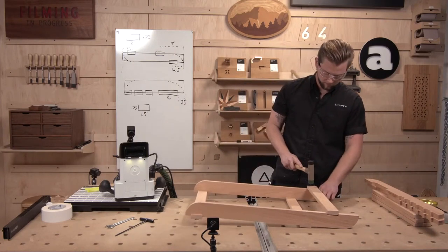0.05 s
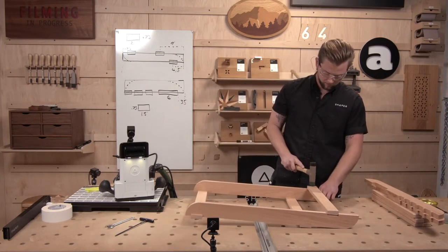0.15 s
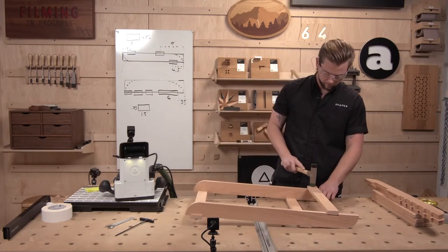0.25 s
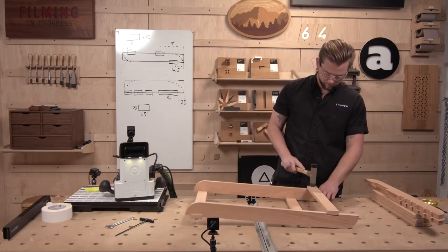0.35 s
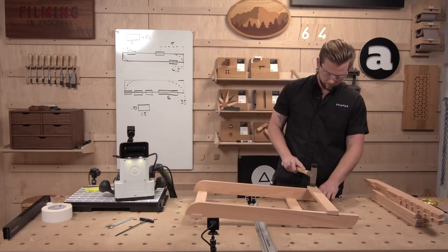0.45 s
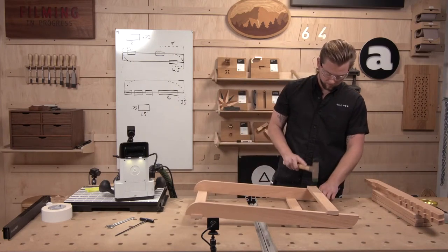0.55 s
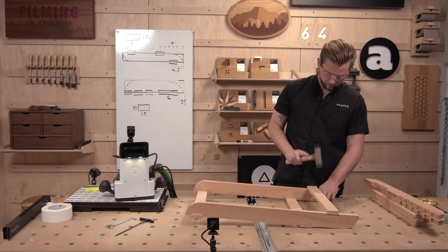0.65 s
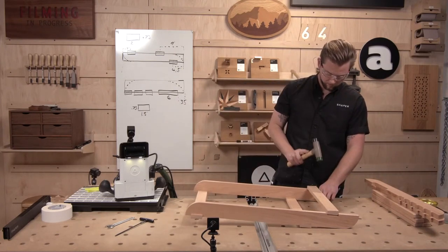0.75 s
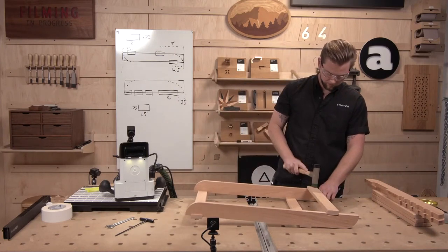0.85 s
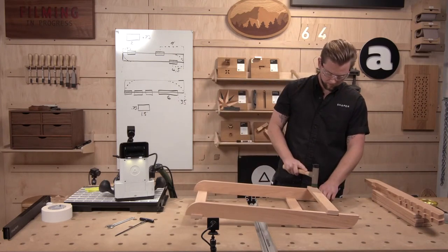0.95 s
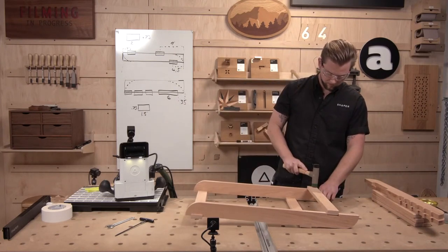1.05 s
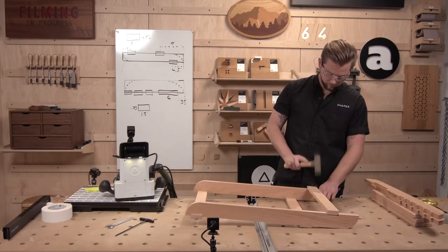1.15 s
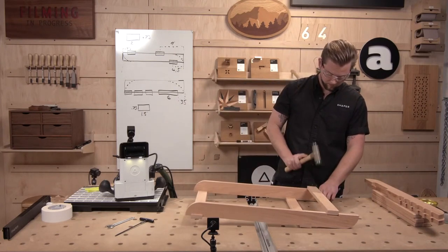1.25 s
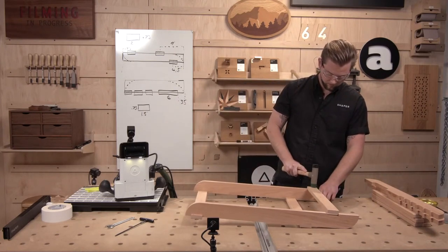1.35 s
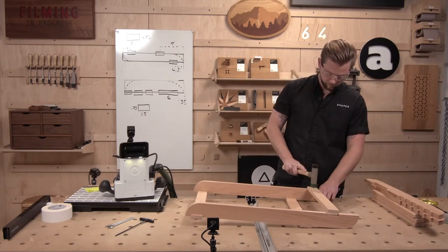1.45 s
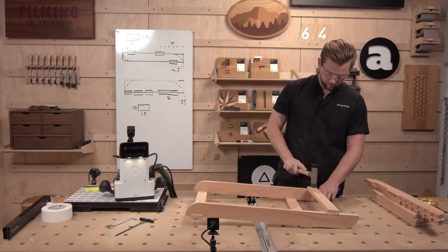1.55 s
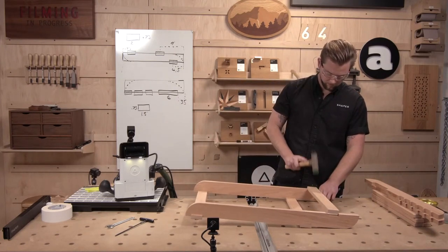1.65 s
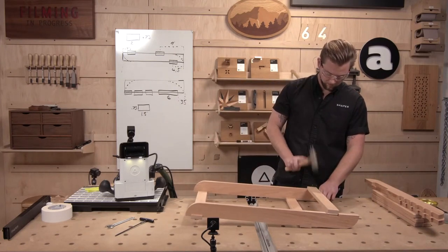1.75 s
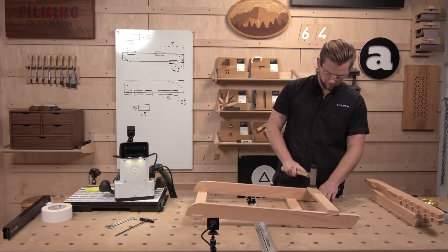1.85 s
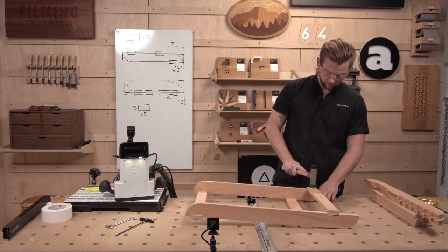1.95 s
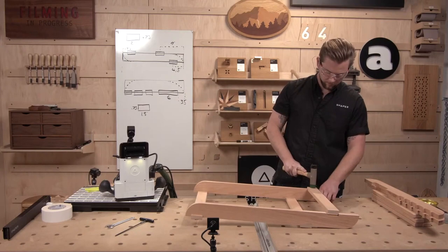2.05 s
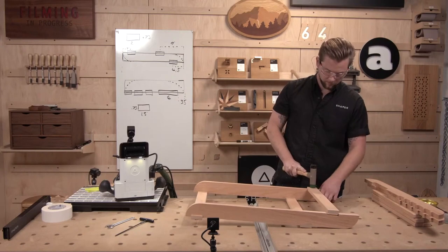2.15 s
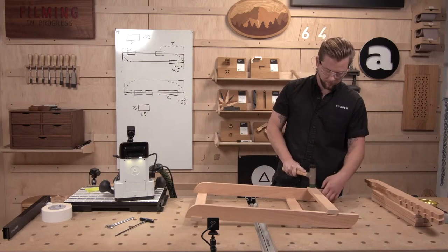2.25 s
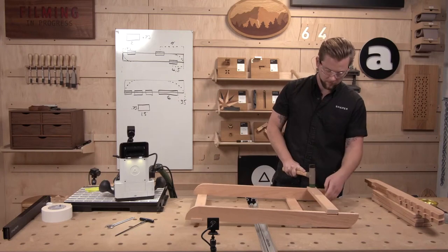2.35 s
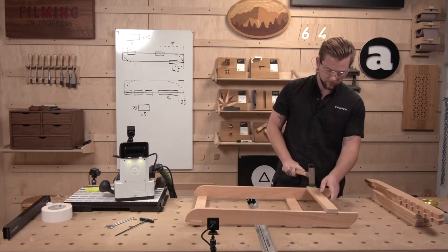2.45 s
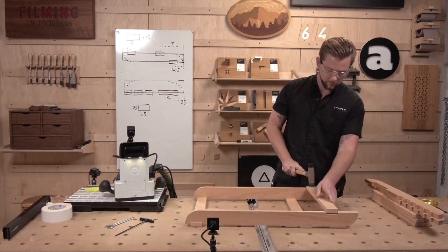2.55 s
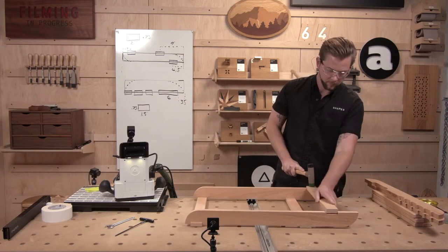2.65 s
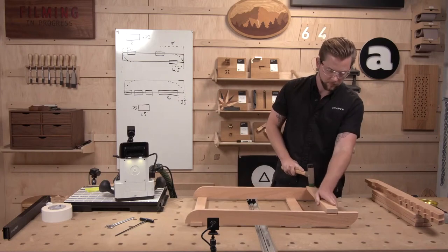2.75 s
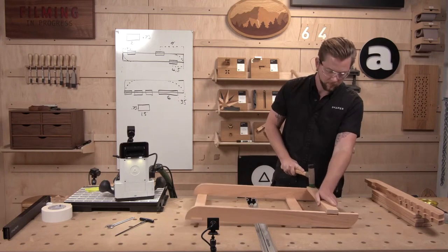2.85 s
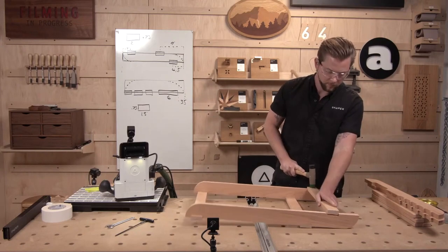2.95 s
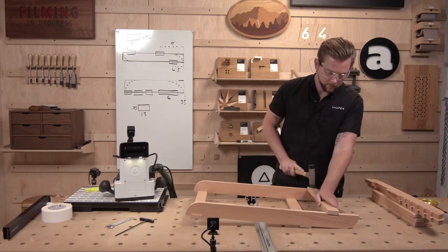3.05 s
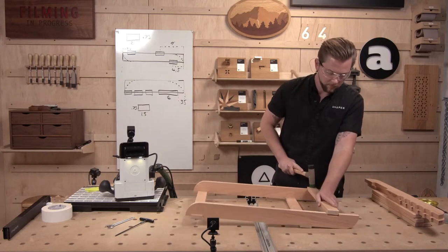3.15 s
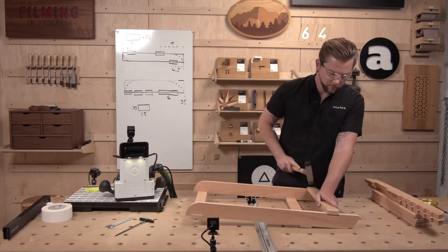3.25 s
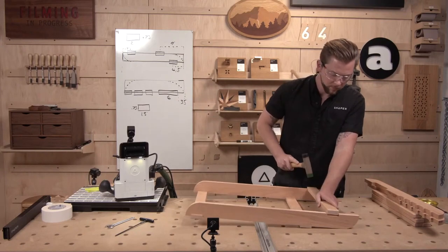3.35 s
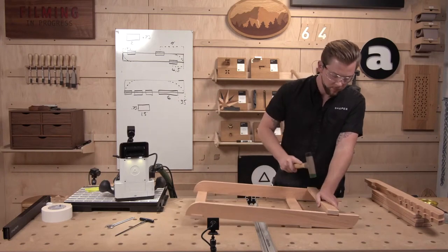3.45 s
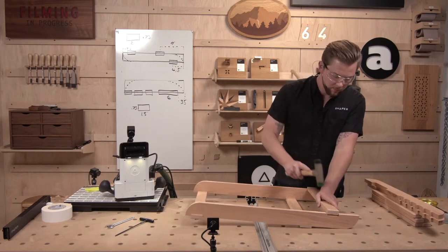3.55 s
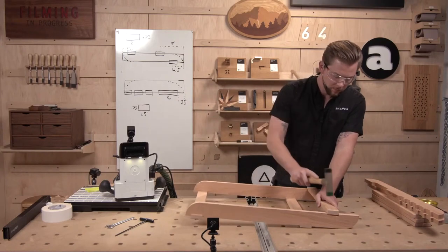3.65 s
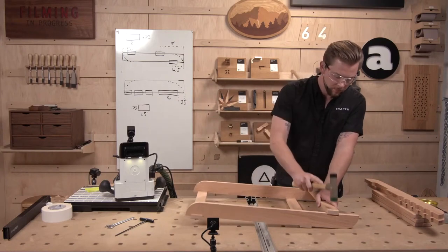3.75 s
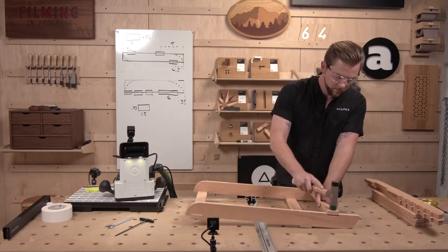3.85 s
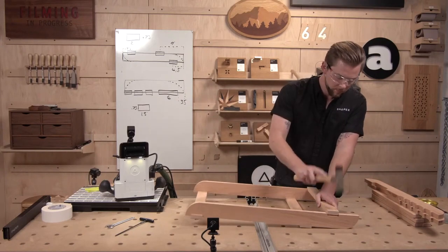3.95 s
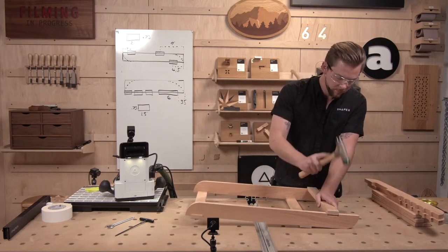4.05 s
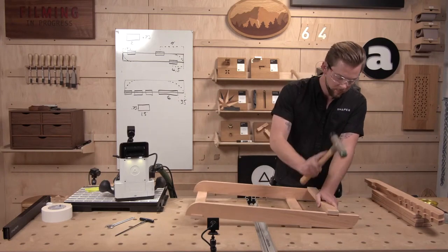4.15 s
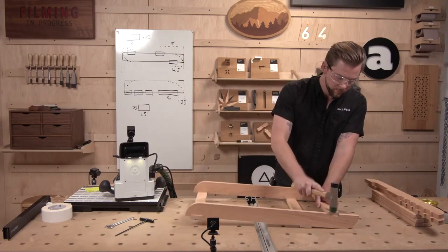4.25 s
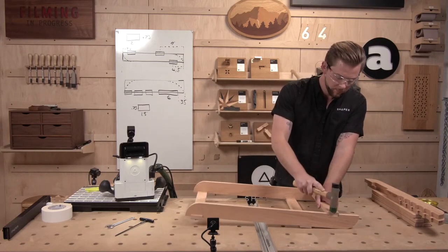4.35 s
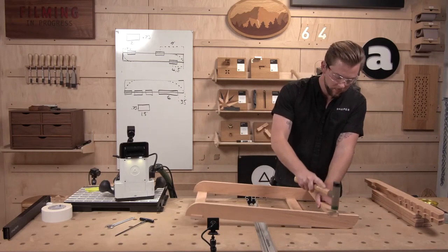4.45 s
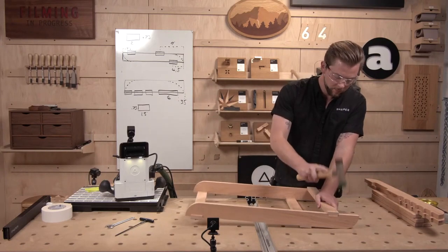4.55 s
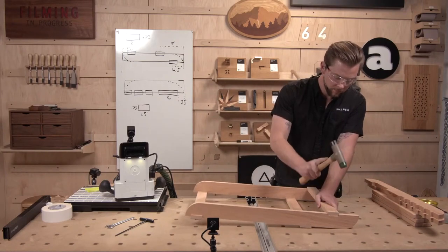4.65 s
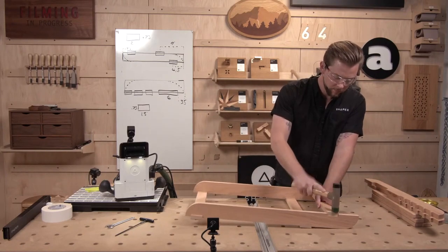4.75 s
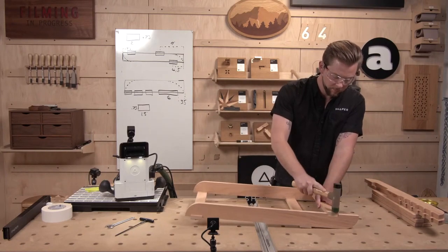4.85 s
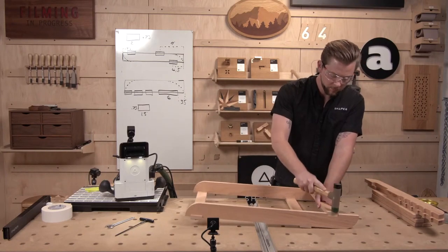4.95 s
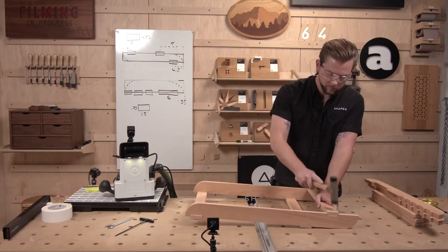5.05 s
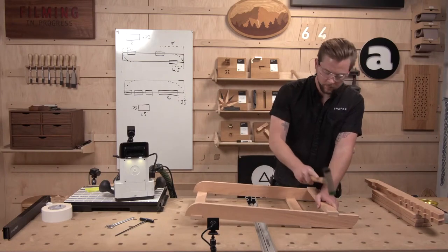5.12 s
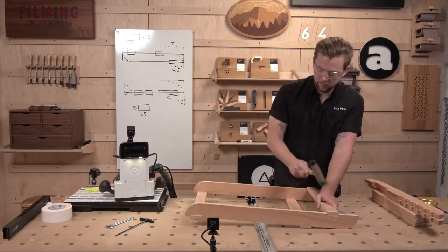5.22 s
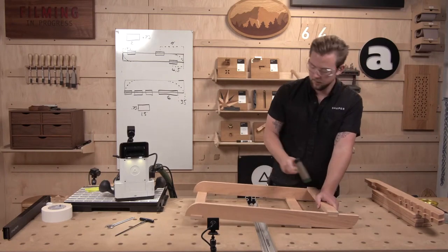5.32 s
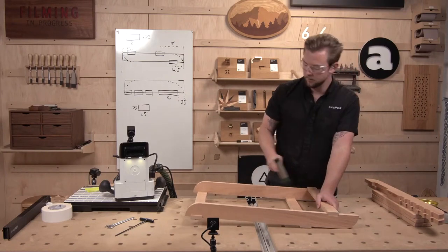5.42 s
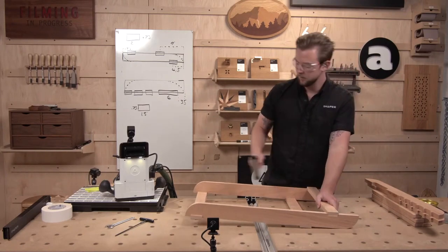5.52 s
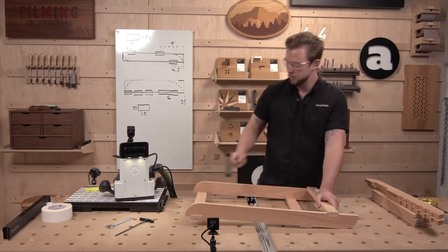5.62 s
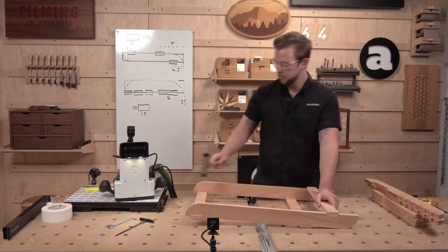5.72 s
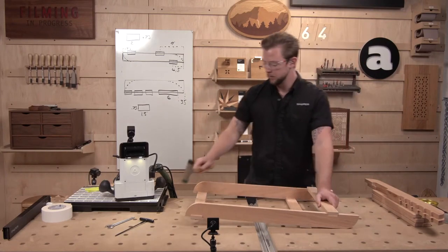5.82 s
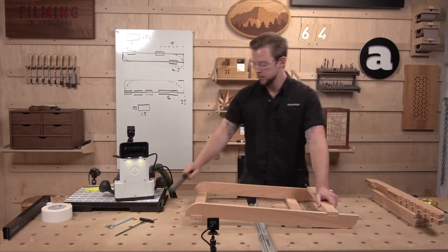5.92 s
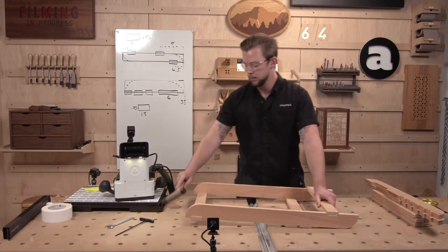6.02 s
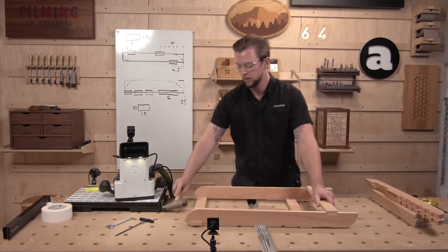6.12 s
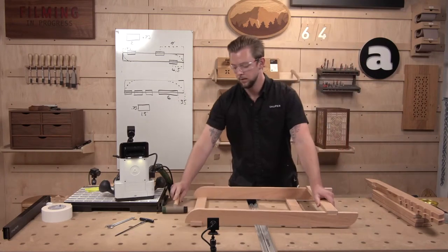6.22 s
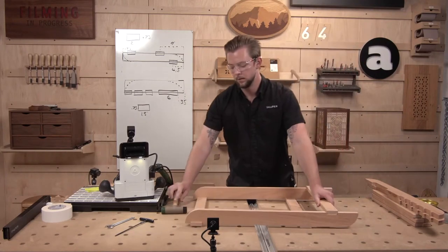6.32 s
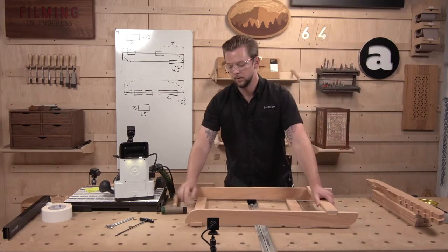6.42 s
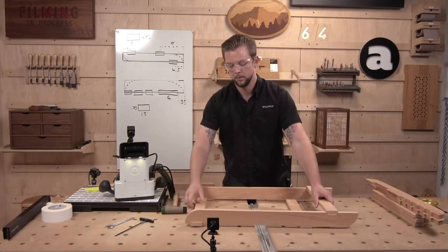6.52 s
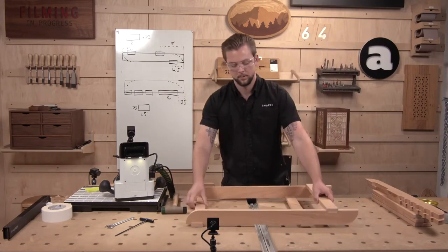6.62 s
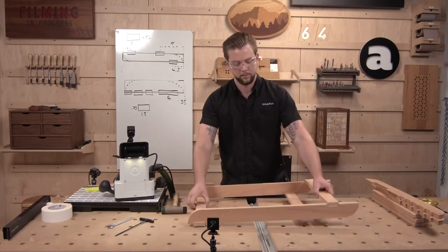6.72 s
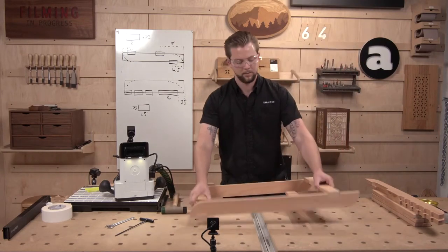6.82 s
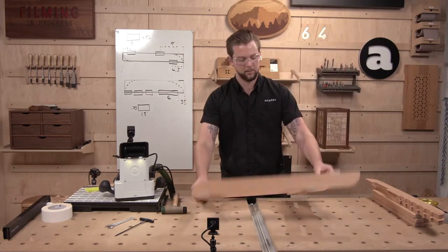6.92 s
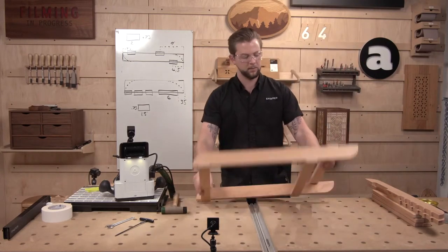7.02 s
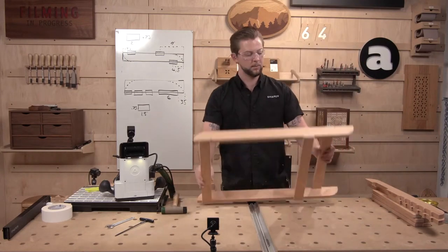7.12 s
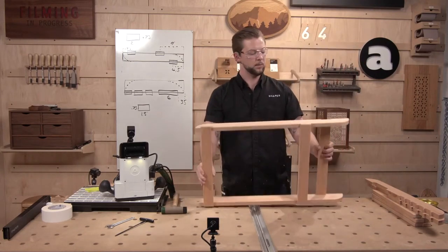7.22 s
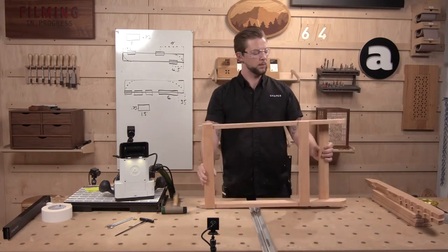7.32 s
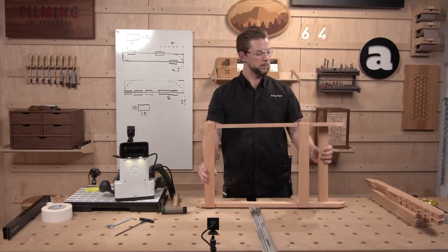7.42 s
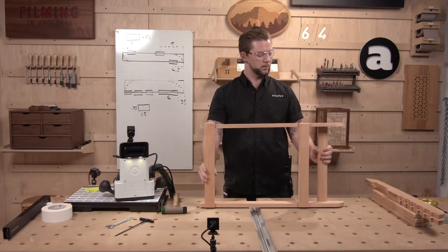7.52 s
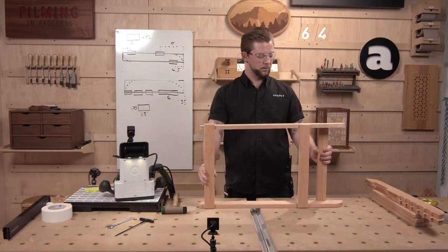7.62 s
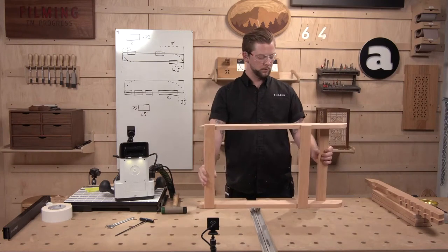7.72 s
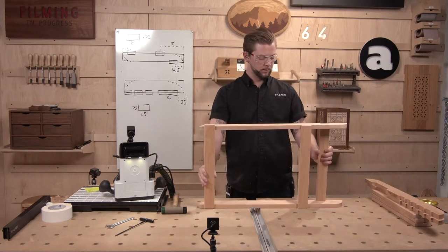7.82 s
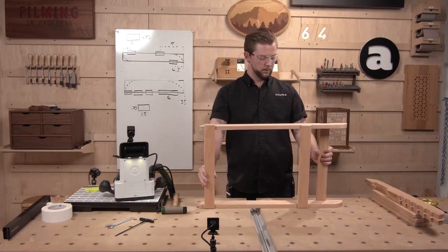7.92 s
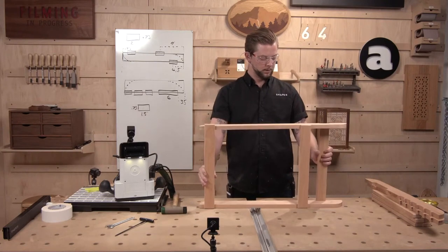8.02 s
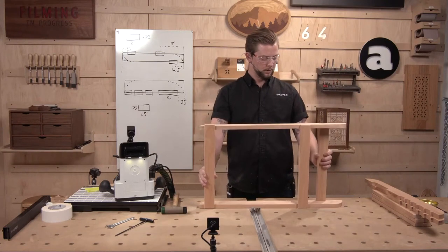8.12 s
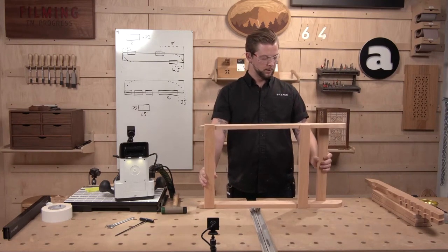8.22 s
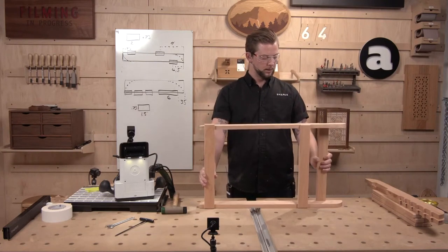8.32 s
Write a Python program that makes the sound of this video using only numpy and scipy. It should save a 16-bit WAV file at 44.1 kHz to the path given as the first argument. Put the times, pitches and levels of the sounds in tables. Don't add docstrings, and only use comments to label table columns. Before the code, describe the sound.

Heard from a microphone on the worker's clothing: fast light wooden taps die away, three hard mallet strikes ring through wood and bench, and the piece bumps down with small ticks. Three further strikes land, the middle one hardest. After a pause the frame clatters onto the bench, scrapes briefly and is set upright with dull knocks, amid rustling cloth, faint room hiss and an open workshop echo.

```python
import sys
import numpy as np
from scipy import signal
from scipy.fft import rfft, irfft
from scipy.io import wavfile
from scipy.ndimage import uniform_filter1d, map_coordinates

SR = 44100
rng = np.random.default_rng(int(sys.argv[2]) if len(sys.argv) > 2 else 0)


def digitize_waveform(pressure):
    field = np.atleast_2d(pressure).T
    bounded = np.clip(field, -1, 1)
    quanta = np.round(bounded * 32767).astype(np.int16)
    wavfile.write(sys.argv[1], SR, quanta)


def gain_from_db(level_db):
    decades = np.asarray(level_db, float) / 20
    return 10 ** decades


N = 369558
SIZE = 2 ** 13
HZ = np.fft.rfftfreq(SIZE, 1 / SR)
ROCK_TREBLE_DB = -32.5

# frequency in Hz, level in dB re peak, t60 in s.
BENCH_DRONE = [(174, -49, 2.6), (312, -60, .6), (393, -62, .5)]
SEATED_DB = [
    -13.5,
    -9,
    -6,
]


def unit(x):
    return x / np.sqrt(np.mean(x ** 2) + 1e-30)


def along(points, hz):
    f, v = np.transpose(points)
    return np.interp(np.log(hz + 1), np.log(f + 1), v)


def wobble(rate):
    knots = rng.standard_normal(int(N * rate / SR) + 4)
    return map_coordinates(knots, [np.arange(N) * rate / SR])


def hiss(spectrum, size=N, tilt=((1, 0),)):
    hz = np.fft.rfftfreq(size, 1 / SR)
    gain = gain_from_db(along(spectrum, hz) + along(tilt, hz))
    return unit(irfft(rfft(rng.standard_normal(size)) * gain, size))


def causal(db):
    cepstrum = irfft(np.log(gain_from_db(db)), SIZE)
    cepstrum[1:SIZE // 2] *= 2
    cepstrum[SIZE // 2 + 1:] = 0
    return np.exp(rfft(cepstrum))


def resonant(peaks, hz):
    return sum((-1) ** k * gain_from_db(db) * 1j * hz * width / (centre ** 2 - hz * hz + 1j * hz * width)
               for k, (centre, width, db) in enumerate(peaks))


def ringing(modes, longest_s, size):
    t = np.arange(size) / SR
    swell = (1 - t / t[-1]) * (1 - np.exp(-(t / .0008) ** 2))
    return swell * sum(gain_from_db(db - 60 * t / min(t60, longest_s)) * np.sin(2 * np.pi * hz * t)
                       for hz, db, t60 in modes)


def dying(tone, tilt, t60s, onset_s, size):
    hz, t, bands = signal.stft(hiss(tone, size, tilt), SR, nperseg=256)
    decay = gain_from_db(-60 * t / along(t60s, hz)[:, None])
    tail = signal.istft(bands * decay, SR, nperseg=256)[1][:size]
    return tail * (1 - np.exp(-(np.arange(size) / SR / onset_s) ** 2))


def contacts(events, tones, peaks, own, rebounds, ring_tone, room_tone, soft_hz, scatter, size, mirrored=False):
    # frequency in Hz, t60 in s.
    wood_t60 = [(60, 0.24), (250, 0.1), (700, .13), (2000, 0.14), (5000, 0.067), (12000, 0.12)]
    room_t60 = [(60, 0.79), (250, 1.8), (700, 0.44), (1000, .7), (1500, 0.94), (3000, 1.144), (6000, 1.4),
                (12000, 0.8)]
    # delay in s, level in dB.
    usual_rebounds = [(.0009, 1.5), (.002, 5), (.004, -14), (.008, -16.5), (.013, -16)]
    room_keeps = 0.15
    out, events = np.zeros(N + size), np.array(events)
    soft = 1 / (1 + 1j * HZ / soft_hz) ** 4
    usual_bass, usual_treble = np.median(events[:, 2:4], axis=0)
    for k, ((s, peak_db, bass_db, treble_db, room_db, ring_db), tone) in enumerate(zip(events, tones)):
        bass, treble = bass_db - usual_bass, treble_db - usual_treble
        tilt = [(250, bass), (1000, 0), (4500, treble), (12000, treble)]
        if k < len(own):
            wood, echoes = resonant(own[k], HZ), rebounds[k]
        else:
            wood, echoes = resonant(peaks, HZ) * causal(along(tilt, HZ)), usual_rebounds

        wood_db = 20 * np.log10(np.abs(wood * soft)[1:] + 1e-6)
        room_colour = np.transpose([HZ[1:], room_keeps * (wood_db - uniform_filter1d(wood_db, size=400))])
        slap_s, slap_db = echoes[0]
        mirror = 1 + gain_from_db(slap_db) * np.exp(-2j * np.pi * HZ * slap_s)
        mirror_db = 20 * np.log10(np.abs(mirror) + .05)
        ring_db_per_hz = along(tilt, HZ) + mirror_db * mirrored / (1 + (HZ / 1200) ** 2)
        ring_colour = np.transpose([HZ, ring_db_per_hz])[1:]

        force = 1
        for lag, db in echoes:
            lag = lag * (1 + scatter * rng.uniform(-1, 1))
            force = force + gain_from_db(db) * np.exp(-2j * np.pi * HZ * lag)
        direct = irfft(force * wood * soft, SIZE)[:SIZE // 2]

        sound = tone + gain_from_db(room_db) * dying(room_tone, room_colour, room_t60, 0.0063, size)
        sound[:SIZE] += gain_from_db(ring_db) * dying(ring_tone, ring_colour, wood_t60, 0.00091, SIZE)
        sound[:SIZE // 2] += direct / np.abs(direct).max()
        out[round((s + .0008) * SR):][:size] += gain_from_db(peak_db) * sound
    return out[:N]


def bumps(events, peaks, own, ring_tone, bass_db_per_octave, soft_hz, note_db, note_t60, room_db, size):
    # frequency in Hz, level in dB per Hz.
    room_tone = [(76, -31.5), (130, 6), (183, -8), (527, -1), (571, 2.5), (980, -0.5), (3300, -12.5),
                 (7250, -30.5), (13200, -41), (15500, -41)]
    # delay in s, level in dB.
    bounces = [(.004, -14), (.008, -13), (.013, -13)]
    notes, rows = [], []
    for s, db, treble_db, ring_db, hz in events:
        notes.append(ringing([(hz, ring_db + note_db, note_t60)], 1, size))
        bass_db = bass_db_per_octave * np.log2(hz)
        rows.append((s, db, bass_db, treble_db, room_db, ring_db))
    return contacts(rows, notes, peaks, own, [bounces] * len(own), ring_tone, room_tone,
                    soft_hz, scatter=0.307, size=size)


def room_air():
    # frequency in Hz, level in dB per Hz.
    air_colour = [(60, -30), (100, -3), (177, -14.5), (219, -2.5), (300, -20.5), (560, -20.5),
                  (1500, -32.5), (5000, -41), (12500, -41), (13500, -50), (16000, -62)]
    return gain_from_db(-73 + 3.0 * wobble(1.4)) * hiss(air_colour)


def body_rumble():
    # time in seconds, rumble level in dB.
    movement = [(0.0, -54), (0.7, -55.5), (1.07, -54.5), (1.3, -53.5), (1.47, -59), (2.22, -62),
                (2.38, -54), (3.26, -51.5), (3.71, -59), (4.15, -49), (4.46, -58.5), (5.09, -65.5),
                (5.6, -52), (6.33, -55.5), (7.19, -53), (7.63, -54.5), (7.98, -56.5), (8.38, -55)]
    # frequency in Hz, level in dB per Hz.
    rumble_colour = [(8.8, -26.5), (15, 5), (46, -3.5), (119, -21), (160, -27.5), (177, -44), (222, -37.5),
                     (300, -25.5), (390, -54), (660, -120)]
    level_db = np.interp(np.arange(N) / SR, *np.transpose(movement)) + 1.5
    return gain_from_db(level_db) * unit(gain_from_db(2.5 * wobble(18)) * hiss(rumble_colour))


def cloth_rustle():
    # middle in seconds, level in dB, half length in s.
    strokes = [
        (2.401, -80, 0.024),
        (2.76, -78.5, 0.072),
        (5.507, -79.5, 0.0082),
        (5.96, -80.5, 0.13),
        (6.535, -75, 0.11),
        (6.909, -73.5, 0.12),
        (7.155, -79, 0.09),
        (8.187, -71.5, 0.079),
    ]
    # frequency in Hz, level in dB per Hz.
    cloth_colour = [(1470, -34), (2500, -3.5), (4140, -1.5), (4680, -1), (5360, -3), (8100, -7),
                    (12500, -4), (15500, -12.5)]
    now = np.arange(N) / SR
    level = gain_from_db(-93)
    for s, db, half_s in strokes:
        level = level + gain_from_db(db - 10.5 * ((now - s) / half_s) ** 2)
    return level * unit(gain_from_db(1.1 * wobble(29)) * hiss(cloth_colour))


def shuffling():
    # time in seconds, level in dB.
    stir = [
        (0, -83.5),
        (2.4, -79),
        (5.3, -84.5),
        (5.55, -71),
        (6.05, -70),
        (6.8, -77),
        (7.25, -66),
        (7.7, -70.5),
        (7.95, -68.5),
        (8.38, -70),
    ]
    # frequency in Hz, level in dB per Hz.
    shuffle_colour = [(150, -34.5), (350, -1.5), (1500, -6.5), (5000, -20), (12000, -31), (16000, -46)]
    level_db = np.interp(np.arange(N) / SR, *np.transpose(stir)) + 2.9 * wobble(5.1)
    return gain_from_db(level_db) * hiss(shuffle_colour)


def drag(size=16384):
    # frequency in Hz, width in Hz, level in dB.
    rail_notes = [(317, 86, 0.5), (565, 74, 1.5), (810, 110, -2), (1150, 31, -1.5)]
    middle_s, half_s, level_db = 6.93, 0.045, -55.5
    t = (np.arange(size) - size / 2) / SR
    response = resonant(rail_notes, np.fft.rfftfreq(size, 1 / SR)) ** 2
    rub = unit(irfft(rfft(rng.standard_normal(size)) * response, size))
    out = np.zeros(N)
    out[round(middle_s * SR) - size // 2:][:size] = gain_from_db(level_db - 7.0 * (t / half_s) ** 2) * rub
    return out


def small_parts(size=12000):
    # start in seconds, peak in dB, note in Hz.
    ticks = [(0.024, -59, 3280), (0.0524, -70, 3760), (0.088, -63, 3400), (0.1104, -72, 3760),
             (0.1456, -69, 2630), (0.1664, -75, 2460), (0.2004, -71, 2520), (0.2204, -75, 2400),
             (0.283, -48, 3820), (0.312, -59, 3240), (2.9616, -43.5, 2630), (2.988, -45, 3380),
             (3, -51, 3180), (3.012, -40.5, 2640), (3.1044, -31.5, 2620), (3.123, -36, 2660),
             (3.137, -42, 3360), (3.1504, -42, 2630), (3.2026, -50.5, 2760), (3.2615, -58, 2620),
             (3.279, -61, 4620), (6.708, -50, 2700), (7.5531, -64, 2500)]
    # start in seconds, modes of frequency in Hz, level in dB, t60 in s.
    pings = [
        (.036, [(3250, -59, 0.055)]),
        (.055, [(3760, -68, .05)]),
        (.113, [(3760, -66, 0.054)]),
        (0.2819, [(3760, -34.5, 0.021), (5120, -59, 0.057)]),
        (.9368, [(3100, -26, 0.011), (3500, -27, 0.013)]),
        (3.862, [(12800, -44, 0.088), (11600, -72, .05)]),
        (4.342, [(8900, -60, .07)]),
        (6.232, [(6300, -59, .22), (9340, -54, 0.088)]),
        (6.298, [(4400, -22.5, 0.0096)]),
        (6.345, [(4460, -38, 0.0098)]),
    ]
    # start in seconds, peak in dB, note in Hz.
    thumps = [(0.891, -30.5, 211), (1.363, -39, 110), (1.843, -32, 216), (2.96, -34, 190),
              (3.852, -23.5, 147.4), (4.809, -30, 220), (4.298, -25, 290), (2.554, -24.5, 318),
              (6.653, -33, 198), (7.367, -42.5, 72.4), (7.493, -28, 112), (7.528, -32.5, 67.6),
              (7.691, -37.5, 57)]
    snap_colour = [(1200, 2), (3000, 8.0), (5500, 3), (14000, -10.5)]  # Hz, dB per Hz
    out, t = np.zeros(N + size), np.arange(size) / SR
    for s, db, hz in ticks:
        snap = 0.34 * gain_from_db(-60 * t / 0.022) * hiss(snap_colour, size)
        note = ringing([(hz, -6, .012)], 1, size)
        out[round(s * SR):][:size] += gain_from_db(db + 2.0) * (snap + note)
    for s, modes in pings:
        out[round(s * SR):][:size] += ringing(modes, 1, size)
    for s, db, hz in thumps:
        press = 1 - np.exp(-t / 0.0013)
        out[round(s * SR):][:size] += gain_from_db(db - 5.0) * press * ringing([(hz, 0, .18)], 1, size)
    return out[:N]


def frame_knocks():
    # start in seconds, peak in dB, treble in dB, wood ring in dB, note in Hz.
    knocks = [(2.5525, -17.5, -9.5, -8, 787), (6.1905, -15, -15.5, -2.5, 812),
              (6.2275, -14, -14.5, -4.5, 452), (6.297, -16, -17, -5.5, 765), (6.389, -7.5, -4, -14, 948),
              (6.65, -25, -22.5, -4, 317), (7.365, -29, -16, -7, 326), (7.489, -34.5, -34, 5, 371),
              (0.281, -38, -33, 6, 294), (2.549, -16, -46, -21.5, 270), (2.9555, -33.5, -21, -8, 643),
              (2.9605, -25.5, -36, -11.5, 650), (2.988, -28.5, -31, -7.5, 432),
              (2.998, -28, -20.5, -7.5, 555), (3.019, -47.5, -28, 2.5, 460), (3.102, -31.5, -42, -8, 694),
              (3.1075, -28.5, -19, -8, 680), (3.135, -37.5, -20, 0, 590), (6.176, -42, -27, -2.5, 251),
              (6.204, -23, -15, -4, 800), (6.263, -34, -8, -2.5, 453), (6.344, -32, -23.5, 4.5, 454),
              (6.429, -32.5, -13, 3.5, 995), (6.71, -29, -16.5, -8.5, 274), (7.507, -38, -19, -6, 570)]
    # frequency in Hz, width in Hz, level in dB.
    bench_peaks = [(380, 240, 7.5), (756, 275, 6), (1850, 570, -11), (2630, 57, -10.5), (3350, 260, -4.5),
                   (3580, 330, -15.5), (4144, 244, -17.5), (5570, 144, -15.5), (6750, 32, -18)]
    landings = [
        [(285, 220, -4.5), (1210, 150, -8.5), (1890, 120, -13), (3640, 170, -33), (4400, 150, -8),
         (5950, 240, -8), (8250, 510, -18)],
        [(287, 170, -10), (800, 190, -6), (2520, 380, -9.5), (3160, 220, -5), (4400, 380, -8), (5570, 230, -13),
         (8370, 310, -33)],
        [(452, 220, 3.5), (1860, 300, -5), (2380, 230, -14), (3030, 230, -29), (4940, 310, -36),
         (6310, 280, -41.5), (8220, 400, -46)],
        [(301, 130, 0), (1230, 580, -4), (2470, 610, -7), (4430, 320, -15), (7260, 320, -38)],
        [(474, 100, -21.5), (966, 94, 12), (1900, 100, 5.5), (2430, 180, 6), (3180, 130, 4.5), (4240, 390, 0),
         (8800, 650, -28)],
        [(294, 260, 2.5), (1330, 110, -6.5), (2700, 900, -6.5), (3360, 190, -29), (5700, 260, -40),
         (7610, 220, -48)],
        [(365, 230, -8), (1130, 42, -2.5), (1800, 190, -24), (3280, 170, -31), (4170, 230, -26),
         (7300, 220, -27)],
        [(365, 45, 7), (614, 44, -4), (850, 43, 16), (2030, 140, -26)] + [(3260, 560, -16), (7000, 230, -17),
         (8800, 380, -10)],
    ]
    # frequency in Hz, level in dB per Hz.
    bench_ring = [(35, -58), (60, -11), (253, -0.5), (443, 1.5), (688, 1.5), (810, -2), (1420, -7),
                  (1520, -11), (2470, -16.5), (3500, -22), (4320, -29.5), (4960, -34.5), (8670, -45),
                  (15500, -68)]
    return bumps(knocks, bench_peaks, landings, bench_ring, bass_db_per_octave=-8.5, soft_hz=8100,
                 note_db=-4.5, note_t60=0.16, room_db=-33.5, size=32000)


def settling():
    # start in seconds, peak in dB, wood ring in dB, note in Hz.
    settles = [(3.152, -36.5, -4, 565), (3.173, -36.5, -4, 684), (3.203, -41.5, 0.5, 365),
               (3.227, -46.5, 0, 474), (3.261, -49.5, 4, 414), (3.289, -43, -12, 595),
               (3.308, -52, -2, 417), (3.332, -51, 2, 400), (3.371, -59.5, 1.5, 606), (3.408, -60, -6, 483),
               (3.449, -83, 1, 560)]
    # start in seconds, peak in dB, treble in dB, note in Hz.
    strays = [
        (0.001, -36.5, -25, 443),
        (1.642, -48, -15, 310),
        (7.567, -43.5, -51, 583),
        (7.684, -47.5, -21, 905),
        (7.718, -50.5, -29, 400),
    ]
    return ([(s, db, ROCK_TREBLE_DB, ring_db, hz) for s, db, ring_db, hz in settles]
            + [(s, db, treble_db, -10.5, hz) for s, db, treble_db, hz in strays])


def frame_rocking():
    # start in seconds, peak in dB, wood ring in dB, note in Hz.
    rocks = [(0.024, -36, -8, 452), (0.052, -30.5, -11, 688), (0.087, -35, -11, 450),
             (0.109, -31.5, -10.5, 620), (0.146, -34.5, -13.5, 422), (0.165, -35.5, -11.5, 631),
             (0.2, -35, -12, 452), (0.221, -37.5, -11, 690), (0.253, -41.5, -10, 474),
             (0.27, -36.5, -22, 720), (0.313, -41.5, -12, 620), (0.345, -46.5, -9, 463),
             (0.38, -48, -9, 406), (0.416, -56, -7.5, 410), (0.442, -61, -8, 415), (0.475, -64, -3, 413),
             (0.532, -65, -7, 423)]
    # frequency in Hz, width in Hz, level in dB.
    loose_peaks = [(160, 120, 2.5), (462, 163, 1.5), (738, 140, -2.5), (1118, 157, -16), (1450, 380, -26),
                   (2002, 140, -27), (3216, 310, -30), (3545, 50, -27)]
    # frequency in Hz, level in dB per Hz.
    loose_ring = [(47, -8), (80, -10.5), (167, -8), (264, 3), (446, -1), (693, 2), (910, -12), (1080, -9.5),
                  (2390, -30), (3340, -36.5), (4120, -39), (12000, -59), (15600, -85), (22000, -120)]
    bass_db_per_octave = -8
    feet = [(s, db, ROCK_TREBLE_DB, ring_db, hz) for s, db, ring_db, hz in rocks]
    crisp = bumps(feet, loose_peaks, [], loose_ring, bass_db_per_octave, soft_hz=4700,
                  note_db=8.0, note_t60=0.064, room_db=-48, size=12000)
    loose = bumps(settling(), loose_peaks, [], loose_ring, bass_db_per_octave, soft_hz=4870,
                  note_db=-2.0, note_t60=0.18, room_db=-42.5, size=12000)
    return crisp + loose


def near_blows(size=60000):
    # start in seconds, peak in dB, then bass, treble and room in dB.
    blows = [
        (0.893, -2, -29, -11, -41.5),
        (1.362, -1.5, -32.5, -9.5, -39),
        (1.84, -1, -38, -11, -41),
    ]
    ring_levels = [-21.5, -17, -19.5]
    # frequency in Hz, width in Hz, level in dB.
    rail_peaks = [
        [(815, 440, 0.5), (1770, 290, -3.5), (3760, 630, -2), (5370, 200, -34), (6200, 180, -15),
         (6800, 220, -9), (8910, 410, -15), (11600, 400, -35.5)],
        [(948, 370, -6), (1640, 210, -2.5), (3710, 320, -3), (4800, 88, -6.5), (6470, 120, -15.5),
         (8150, 750, -20), (9450, 530, -24), (10314, 490, -21.5), (12900, 610, -32.5)],
        [(1010, 600, -5.5), (1800, 450, -4.5), (3710, 230, -1), (4680, 350, -5.5), (6850, 630, -13.5),
         (8250, 400, -16), (9230, 360, -20), (8900, 280, -28), (11885, 470, -34.5)],
    ]
    # frequency in Hz, level in dB, t60 in s.
    frame_modes = [
        [(226.6, 0.5, 5.0), (539, -0.5, 5.0), (694, 8, 0.061), (1585, -31.5, 0.053), (2002, -11, 0.1),
         (2240, -13, 0.37), (3330, 2.5, 0.048), (4610, -0.5, 0.011)],
        [(680, -16, 0.12), (1030, 11, 0.06), (1300, 2, 0.017), (2250, -28, 0.39), (2630, -7.5, 0.1),
         (3400, -23.5, 0.091), (3920, -25.5, 0.12)],
        [(100, 5.5, 0.022), (680, -9.5, 0.054), (1013, 9.5, 0.051), (1540, 1, 0.027), (2330, -9.5, 0.12),
         (2400, -8, 0.15), (3250, -5, 0.062), (4420, -5, 0.07)],
    ]
    # frequency in Hz, level in dB re peak, t60 in s.
    head_modes = [(12640, -58, .25), (12890, -58.5, .2)]
    # delay in s, level in dB.
    slaps = [(.00105, -2), (.001, -4), (.001, -3.5)]
    late_rebounds = [(.0045, -16.5), (0.01, -17.5)]
    # frequency in Hz, level in dB per Hz.
    rail_ring = [(24, -34.5), (40, -13.5), (427, -1.5), (548, -10.5), (740, 1.5), (881, -10), (1020, -4),
                 (1160, -7), (2270, -8.5), (5860, -14), (6480, -21.5), (12100, -37.5), (13000, -38.5),
                 (15500, -51)]
    rail_room = [(160, -38.5), (270, -17.5), (309, -5), (348, -10), (569, -0.5), (697, 1.5), (785, -2),
                 (1050, -2), (1370, -5), (2100, -1), (3860, -10), (5800, -18), (6760, -18), (13100, -31.5),
                 (15500, -45.5)]
    bench, head = ringing(BENCH_DRONE, 1.8, size), ringing(head_modes, 1, size)
    tones = [gain_from_db(-23.5) * ringing(modes, 0.13, size) + gain_from_db(db) * bench + head
             for modes, db in zip(frame_modes, SEATED_DB)]
    rows = [(*row, db) for row, db in zip(blows, ring_levels)]
    rebounds = [[slap, *late_rebounds] for slap in slaps]
    return contacts(rows, tones, rail_peaks[1], rail_peaks, rebounds, rail_ring, rail_room,
                    soft_hz=15380, scatter=0.04, size=size, mirrored=True)


def end_blows(size=60000):
    # start in seconds, peak in dB, then bass, treble and room in dB.
    blows = [
        (3.851, -6.5, -21, -22.5, -45),
        (4.297, 1, -21.5, -17.5, -39.5),
        (4.806, -2, -18.5, -10.5, -35.5),
    ]
    ring_levels = [-14.5, -19, -18.5]
    # frequency in Hz, width in Hz, level in dB.
    joint_peaks = [
        [(959, 270, 3.4), (1950, 320, 1)] + [(3460, 96, -0.5), (6440, 220, -10), (7413, 250, -15.5), (8400, 220, -15.0), (9560, 310, -15.0), (11600, 240, -13), (12270, 450, -14.0)],
        [(220, 170, -7.5), (1000, 710, -1), (2100, 200, -6), (3225, 370, -2.5), (5380, 284, -13.5), (5160, 460, -14), (6240, 190, -17), (7850, 510, -26), (10200, 310, -27.5)],
        [(307, 176, 6), (582, 50, 7), (776, 120, -0.5), (2005, 300, -14.0)] + [(2845, 330, -6.5), (3780, 330, 0), (7060, 810, -21), (8470, 340, -23), (9390, 270, -25), (10600, 210, -24.5), (11650, 270, -19.0)],
    ]
    # frequency in Hz, level in dB, t60 in s.
    frame_modes = [
        [(410, -1.5, 0.16), (902, 14.5, 0.025), (1840, -34, 0.13), (2050, 2, 0.037), (3010, -2.5, 0.038),
         (3380, -30, 0.03), (4400, -27, 0.17)],
        [(705, -4.5, 0.026), (1250, -3.5, 0.13), (1506, -11.5, 0.083), (2620, -14.5, 0.31), (3200, -14.5, 0.12),
         (190, 7, 0.035), (2250, -6, 0.03)],
        [(128, 12, 0.018), (388, 5, 0.052), (1365, -6, 0.087), (1900, -2.5, 0.057), (2562, -3.5, 0.092),
         (2830, 5.5, 0.032), (3250, -15, 0.046), (4470, -8.5, 0.1)],
    ]
    # delay in s, level in dB.
    slaps = [(.00105, 5.5), (0.0009, -4), (.0012, -11)]
    late_rebounds = [(.0042, -12), (.0097, -10.5)]
    # frequency in Hz, level in dB per Hz.
    joint_ring = [(24, -39), (40, -3.5), (183, -3.5), (377, 7), (686, -4.5), (1080, -0.5), (1490, 2.5),
                  (1770, -4), (2510, -3), (2770, -12), (3930, -7), (5720, -14), (10900, -23), (15500, -35)]
    joint_room = [(160, -49.5), (270, -25), (304, -8), (342, -8.5), (392, -9.5), (589, -1), (855, 1.5),
                  (1100, -3.5), (1550, 0), (2440, -0.5), (4060, -8.5), (5800, -19), (10100, -24),
                  (13100, -29.5), (15500, -62.5)]
    bench = ringing(BENCH_DRONE, 1.8, size)
    tones = [gain_from_db(-18.5) * ringing(modes, 0.26, size) + gain_from_db(db) * bench
             for modes, db in zip(frame_modes, SEATED_DB)]
    rows = [(*row, db) for row, db in zip(blows, ring_levels)]
    rebounds = [[slap, *late_rebounds] for slap in slaps]
    return contacts(rows, tones, joint_peaks[1], joint_peaks, rebounds, joint_ring, joint_room,
                    soft_hz=17100, scatter=0.024, size=size, mirrored=True)


def scene():
    background = room_air() + body_rumble() + cloth_rustle() + shuffling()
    frame = drag() + small_parts() + frame_knocks() + frame_rocking()
    return (background + frame + near_blows() + end_blows())[None]


def roll_off(x):
    return signal.sosfilt(signal.butter(12, 16490, fs=SR, output="sos"), x)


def record(dry):
    held = dry / (1 + np.abs(dry / .6) ** 8) ** (1 / 8)
    top_hz = 15850
    edge_db = 40 * np.log10(np.clip((top_hz - HZ) / 900, .02, 1))
    edge = irfft(causal(edge_db), SIZE)[:1024]
    mix = signal.fftconvolve(held, edge[None], axes=1)[:, 2:N + 2]
    return roll_off(mix)


dry = scene()
out = record(dry)
digitize_waveform(out)
```